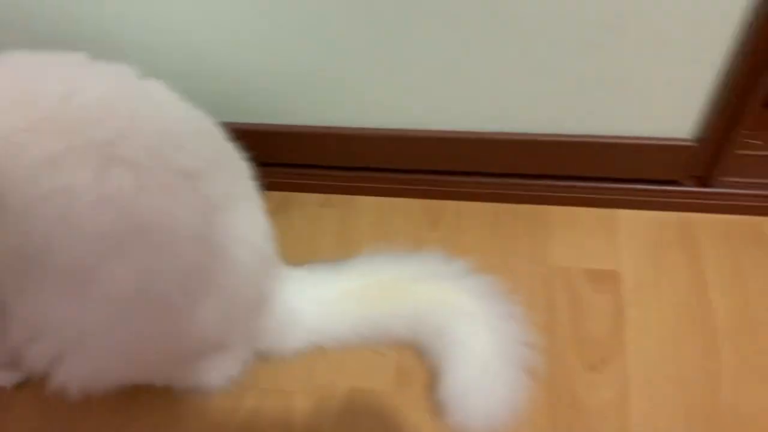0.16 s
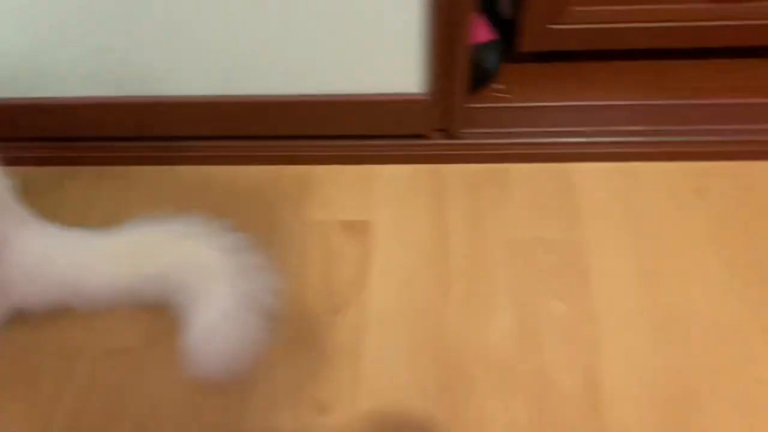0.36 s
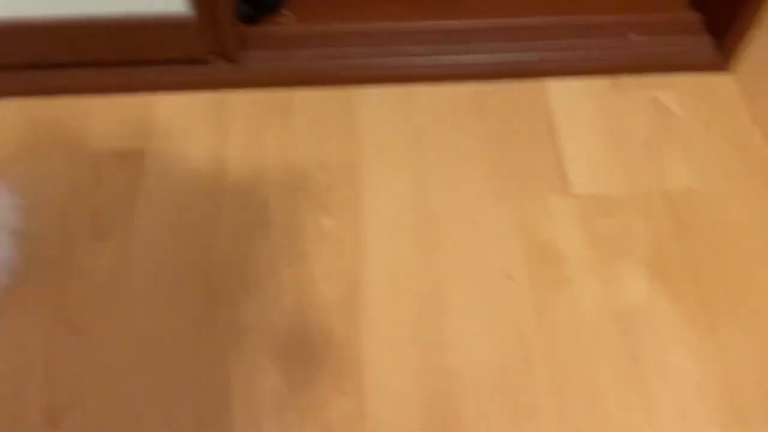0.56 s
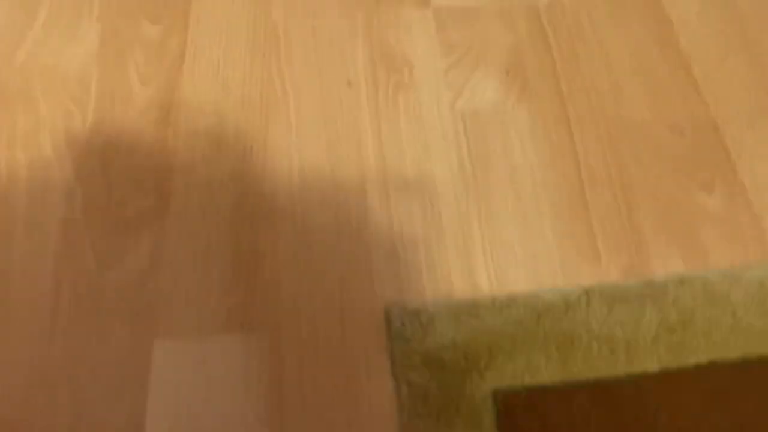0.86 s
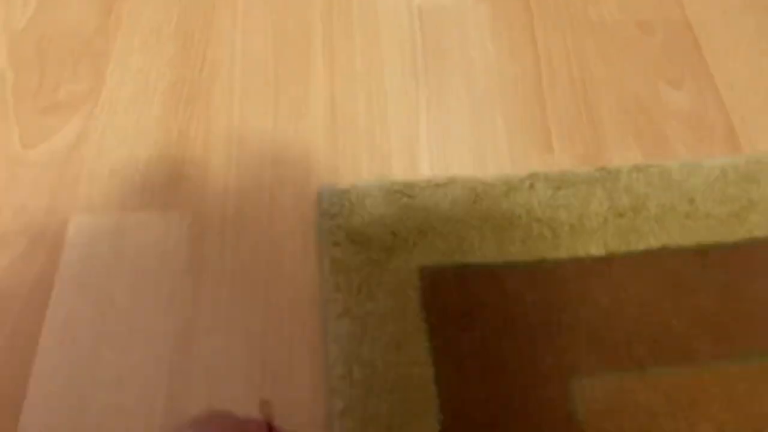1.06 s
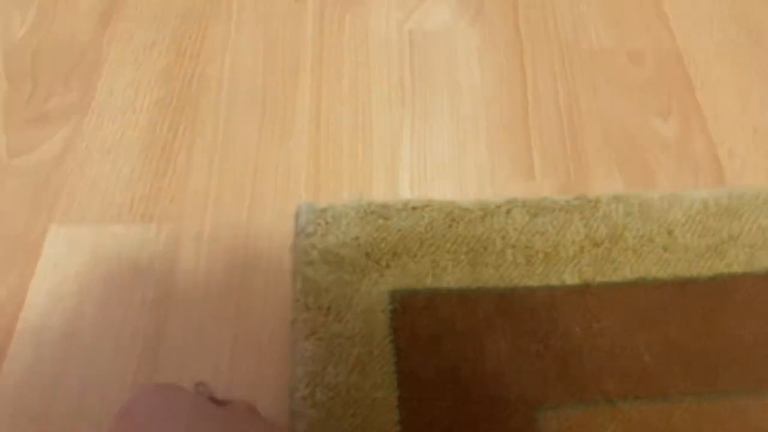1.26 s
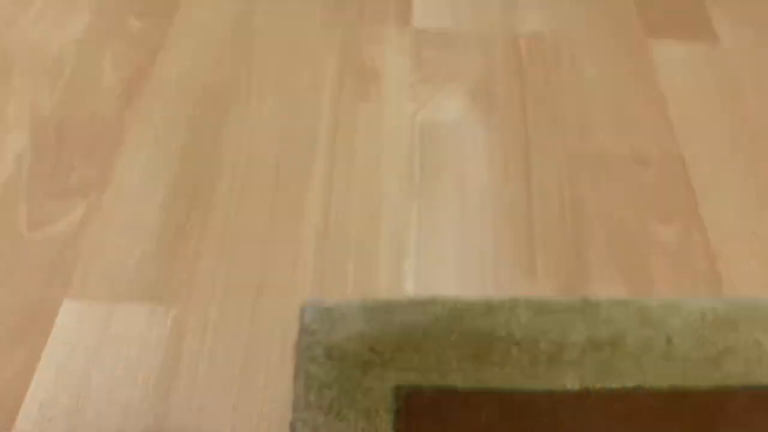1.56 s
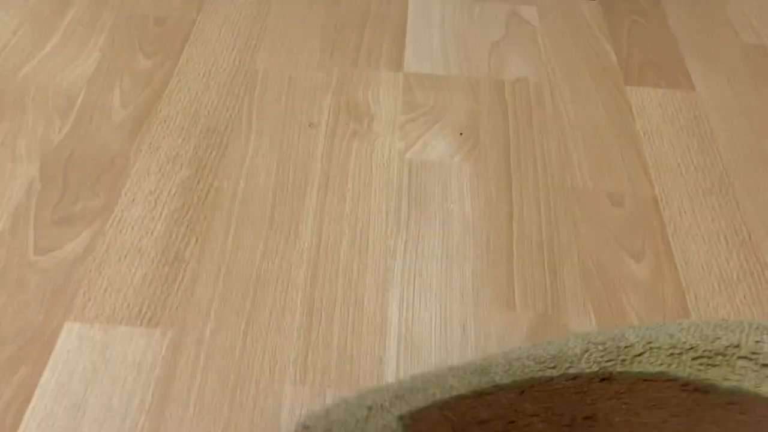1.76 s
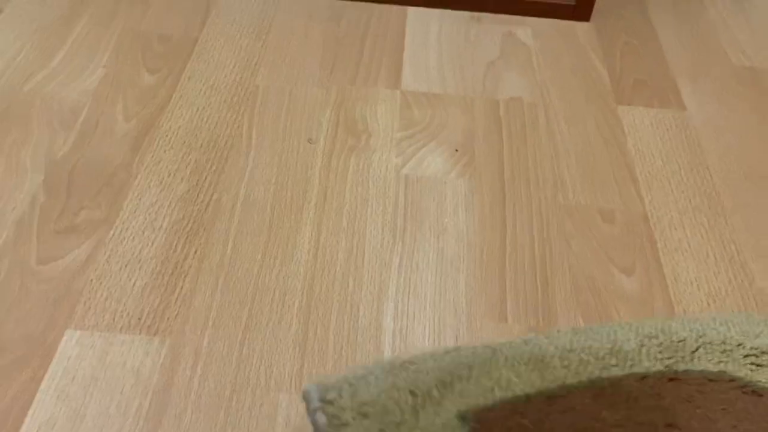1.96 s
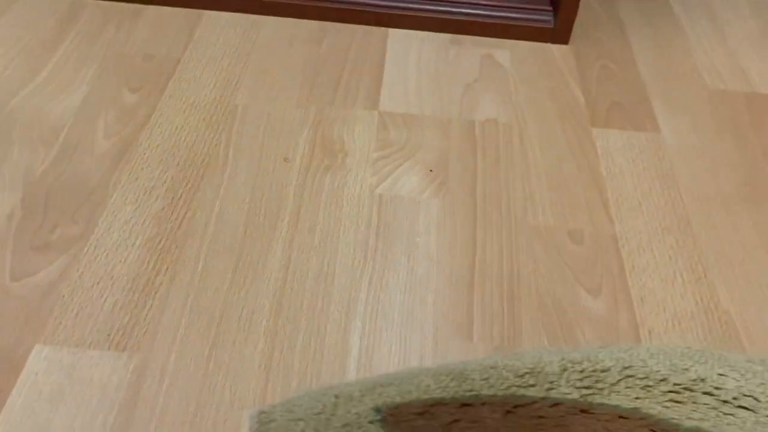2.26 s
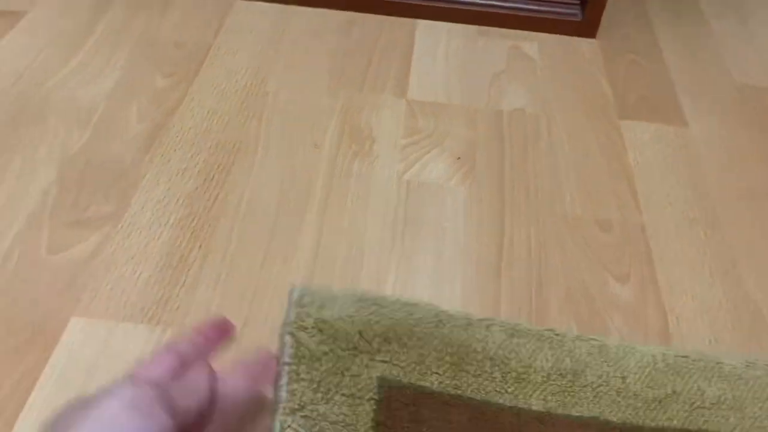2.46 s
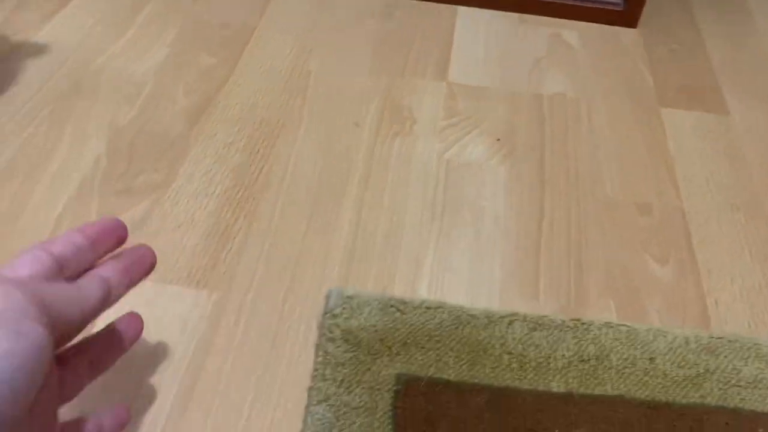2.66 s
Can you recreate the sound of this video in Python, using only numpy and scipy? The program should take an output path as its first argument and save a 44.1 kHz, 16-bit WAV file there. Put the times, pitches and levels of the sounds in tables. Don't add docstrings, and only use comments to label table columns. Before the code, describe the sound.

A small metal pin clicks on a laminate floor in a quiet furnished room, close handheld microphone. Low handling bumps and cloth scuffs open; light taps and wooden knocks come at 0.9-1.0 s, board creaks at 1.1-1.4, a small click at 1.9. The loudest sharp bounce hits at 2.08, weaker ones at 2.2-2.3, then a brief skid and dull paw thump at 2.5, fading to quiet.

```python
import sys
import numpy as np
from scipy import signal
from scipy.fft import rfft, irfft, next_fast_len
from scipy.io import wavfile
from scipy.ndimage import uniform_filter1d

SR = 44100
rng = np.random.default_rng(int(sys.argv[2]) if len(sys.argv) > 2 else 0)


def undo_db(level):
    steps = np.asarray(level, float) / 20
    return 10 ** steps


def wav_out(sig):
    wavfile.write(sys.argv[1], SR, np.round(np.clip(np.atleast_2d(sig).T, -1, 1) * 32767).astype(np.int16))


N = 123479

# time in seconds, level in dB.
GRIP_LEVEL = [(0, -62), (.7, -60), (1.1, -62.5), (1.3, -65), (1.45, -70), (1.55, -78.5), (1.8, -75.5),
              (1.95, -72.5), (2.3, -80.5), (2.42, -63.5), (2.47, -72), (2.55, -58), (2.8, -68)]
# frequency in Hz, density in dB per Hz.
GRIP_SPECTRUM = [(25, -21.5), (60, -4), (130, -5), (250, -21.5), (600, -29), (1200, -67)]
# peak time in seconds, peak in dB, pitch in Hz, width in seconds.
BUMPS = [(0.208, -33.5, 61.8, 0.016), (0.349, -32.5, 65, 0.011), (0.202, -45.5, 128, 0.0047),
         (0.331, -42, 133, 0.0035), (0.3288, -51, 219, 0.0049), (0.371, -39, 74, 0.009),
         (0.395, -39, 59, 0.008), (0.416, -40.5, 60, 0.0035), (0.449, -39.5, 61, 0.012),
         (0.513, -43, 49.5, 0.031), (0.646, -41, 60.6, 0.0096), (0.719, -47, 58.6, 0.015),
         (0.835, -39, 57.7, 0.0084), (0.922, -43, 62, 0.012), (1.462, -57, 77, 0.0052),
         (2.386, -40.5, 80, 0.0043), (2.402, -48, 60, 0.0057), (2.509, -30, 124.3, 0.0034),
         (2.593, -59.5, 80.1, 0.077)]
# time in seconds, level in dB.
AIR_LEVEL = [(0, -67), (.15, -77), (.36, -82), (0.501, -69), (.62, -75), (0.721, -92), (.8, -72),
             (.9, -65.5), (1.049, -63.5), (1.248, -78), (1.5, -67), (1.84, -82.5), (2.05, -65),
             (2.298, -62), (2.42, -69.5), (2.52, -82.5), (2.659, -82.5), (2.8, -74.5)]
# frequency in Hz, density in dB per Hz.
AIR_SPECTRUM = [(88, -40), (150, -10), (282, -7.5), (481, -3), (1180, -17.5), (3100, -19.5), (8000, -24),
                (9000, -32.5), (16500, -28)]
# peak time in seconds, rms in dB, rise in seconds, fall t60 in seconds, centre in Hz.
SCUFFS = [(0.036, -72.5, 0.013, 0.061, 595), (0.089, -70, 0.009, 0.47, 2840),
          (2.054, -58, 0.023, 0.23, 2150), (0.227, -45, 0.053, 0.19, 3430),
          (0.429, -63.5, 0.0035, 0.97, 2850), (0.541, -65, 0.037, 0.35, 5000),
          (0.986, -53.5, 0.013, 0.12, 10500), (2.39, -61.5, .06, 0.25, 11030),
          (0.612, -54.5, 0.055, .15, 2340), (.776, -67, 0.0032, 1, 880), (1.048, -62, 0.049, 0.11, 2350),
          (1.30, -69, 0.019, 0.11, 570), (1.438, -54, 0.072, 0.22, 1500), (1.60, -58.5, 0.14, 0.52, 2670),
          (1.767, -66.5, 0.02, 0.11, 1500), (1.927, -64.5, 0.032, 1, 3370),
          (2.10, -39.5, 0.019, 0.23, 4610), (2.30, -55, 0.057, 0.22, 3750), (2.375, -59.5, .01, 0.15, 1078),
          (2.778, -68.5, 0.14, 0.56, 3660), (0.437, -60.5, 0.0075, 0.56, 670),
          (0.599, -54, 0.057, 0.27, 576), (1.166, -82, 0.11, 0.1, 440), (1.978, -64.5, 0.074, .3, 700),
          (2.509, -60.5, 0.0071, 0.26, 1500)]
# start in seconds, peak in dB, pitch in Hz.
KNOCKS = [(0.701, -56.5, 330), (.7025, -59.5, 624), (0.771, -58.5, 497), (.958, -50.5, 350),
          (1.118, -46, 530), (1.15, -44, 460), (1.1935, -42, 510), (1.295, -56, 645), (1.301, -58, 234),
          (1.389, -53.5, 800), (1.3915, -51, 450), (1.402, -53, 620), (1.409, -49.5, 1030),
          (1.412, -53.5, 398), (1.437, -40.5, 814), (2.097, -41, 530), (2.135, -50, 533), (2.144, -46, 520),
          (0.8865, -35.5, 520), (0.9072, -33.5, 520), (.914, -45, 607), (0.9195, -42.5, 527),
          (0.969, -35, 610), (2.2065, -41.5, 616), (2.217, -47, 487), (2.227, -44.5, 510),
          (2.232, -52, 504), (2.239, -57, 560), (2.2705, -42, 574), (2.284, -53, 414), (2.291, -57.5, 407),
          (2.299, -52, 550), (2.315, -51.5, 524), (2.324, -50.5, 570), (2.3645, -45.5, 595),
          (2.698, -58.5, 436),
          (2.0750, -24, 546),
    (2.1111, -28.5, 519),
    (2.2125, -33, 587),
    (2.277, -43.5, 500),
    (2.371, -48, 620),
    (2.481, -47, 570),
    (2.489, -44, 561),
    (2.507, -46, 328),
    (2.515, -38, 500),
    (2.536, -40.5, 617),
]
# start in seconds, peak in dB, pitch in Hz.
SLIPS = [(1.093, -44.5, 490), (1.099, -48, 420), (1.107, -51, 506), (1.115, -47, 630), (1.126, -48, 542),
         (1.130, -41, 471), (1.137, -56, 405), (1.158, -44.5, 575), (1.172, -45.5, 537), (1.183, -48, 389),
         (1.419, -43.5, 596), (1.423, -45, 627), (1.429, -49, 694), (1.434, -48, 638), (1.877, -48.5, 329),
         (1.884, -43, 342), (1.088, -54, 281), (1.125, -53, 283), (1.155, -55, 257), (2.088, -36, 520),
         (2.124, -39, 517)]
# start in seconds, peak in dB, contact length in seconds, tilt in dB per octave.
STRIKES = [(0.884, -46, 0.0095, -5.5), (.907, -46.5, 0.0033, -2.5), (0.9687, -26, 0.0034, 1),
           (0.9721, -27.5, 0.0027, -3.5), (1.436, -41, 0.011, -2.5), (1.88, -37, 0.0065, -11),
           (1.8848, -32, 0.0008, 4), (2.0746, -16, 0.0017, 3), (2.0769, -12.5, 0.0019, 2),
           (2.0795, -22, 0.0027, 0.5), (2.111, -49.5, 0.0059, -1.5), (2.207, -26, 0.0022, 2.5),
           (2.212, -25.5, 0.0075, 5.5), (2.27, -36.5, 0.0026, 0), (2.276, -36.5, 0.0071, 9),
           (2.469, -48.5, 0.012, 3), (2.48, -43.5, 0.011, -4), (2.496, -28, 0.0069, -11.5)]
# frequency in Hz, level in dB, t60 in seconds.
PIN_MODES = [(1500, -10, 0.0059), (2280, 1, 0.0039), (3004, 10.5, 0.003), (3550, 11.5, 0.0026),
             (4360, 3.5, 0.0038), (5470, 0.5, 0.0032), (6736, -3.5, 0.0048), (7280, -23, 0.011),
             (11340, -33.5, 0.00063), (14100, -18, 0.0082)]
# frequency in Hz, t60 in seconds.
ROOM_T60 = [(150, 0.2), (500, 0.19), (2000, 0.19), (5000, 0.18), (12000, 0.16)]
# frequency in Hz, side minus mid in dB.
WIDTH = [(100, -10.5), (500, -5), (1500, -1.5), (5000, -4), (9000, 0), (14000, 3)]
# lower edge in Hz, upper edge in Hz.
LOST_BANDS = [(8450, 9550), (12500, 13650), (15900, 23000)]
ATTACKS = [
    .886,
    .907,
    .969,
    1.883,
    2.074,
    2.078,
    2.207,
    2.213,
    2.471,
    2.497,
]

SCUFF_OCTAVES, NARROWING = 1.276, 0.27
SKIRT_DB, SKIRT_TILT_DB, DULLING_DB, FOCUS = -8, -2, 6, 0.61
GRAIN_DB = 1
KNOCK_CYCLES, KNOCK_SAG = 3.22, 0.7
SLIP_CYCLES, SLIP_SAG = 5.6, 0.15
SWELL_SKEW, SWELL_EDGE = 0.87, 1.51
BOARD_DB, BOARD_CUT = 2, 0.5
TICK_DB, TICK_HZ, TICK_S = -15.5, 880, 0.0053
CHATTER_PER_S, CRACK_DB = 5100, -8.5
EARLY_UNTIL_S, EARLY_SHIFT, EARLY_CRACK_DB = 1.0, 0.91, 7
PIN_BAND_HZ = [740, 11400]
THUMP_S, THUMP_DB, THUMP_T60_S = 2.4962, -18, 0.032
SWEEP_FROM_HZ, SWEEP_TO_HZ, SWEEP_S = 1067, 221, 0.00372
ROOM_DB, ROOM_GAP_S = 2.5, 0.0011
BOARD_WET_DB, THUMP_WET_DB = -6, -6.5
PIN_PAN_DB, PIN_LEAD_SAMPLES, FLOOR_PAN_DB = 2.5, 1.6, 2.5
KEPT_S = 0.006
LEFT_RIGHT = np.array([[1], [-1]])


def rms_one(x):
    return x / np.sqrt(np.mean(x ** 2) + 1e-20)


def at_hz(points, hz):
    p = np.array(points, float)
    return np.interp(np.log(np.maximum(hz, 1)), np.log(p[:, 0]), p[:, 1])


def coloured(x, points):
    n = x.shape[-1]
    hz = np.arange(n // 2 + 1) * SR / n
    return irfft(rfft(x) * undo_db(at_hz(points, hz)), n)


def stereo(points, n):
    mid, side = coloured(rng.standard_normal((2, n)), points)
    scale = np.sqrt(np.mean(mid ** 2))
    return (mid + coloured(side, WIDTH) * LEFT_RIGHT) / scale


def ring(clicks, hz, t60):
    radius = undo_db(-60 / (t60 * SR))
    w = 2 * np.pi * hz / SR
    return signal.lfilter([0, np.sin(w)], [1, -2 * radius * np.cos(w), radius * radius], clicks + 1e-18)


def add(out, s, x):
    i = max(int(s * SR), 0)
    out[..., i:i + x.shape[-1]] += x[..., :out.shape[-1] - i]


def handling():
    t = np.arange(N) / SR
    bumps = np.zeros(N)
    for s, db, hz, width in BUMPS:
        envelope = np.exp(-0.5 * ((t - s) / width) ** 2)
        bumps += undo_db(db) * envelope * np.cos(2 * np.pi * hz * (t - s))
    delayed_side = undo_db(-15.0) * np.roll(bumps, shift=180) * LEFT_RIGHT
    grip = undo_db(np.interp(t, *np.transpose(GRIP_LEVEL))) * stereo(GRIP_SPECTRUM, N)
    return bumps + delayed_side + grip


def room_air():
    level = np.interp(np.arange(N) / SR, *np.transpose(AIR_LEVEL))
    return undo_db(level) * stereo(AIR_SPECTRUM, N)


def scuffs():
    out, t = np.zeros((2, N)), np.arange(SR) / SR
    hz = np.geomspace(150, 17000, num=24)
    for s, db, rise, t60, centre_hz in SCUFFS:
        rise = np.clip(rise, 0.003, s)
        octaves = SCUFF_OCTAVES * undo_db(-NARROWING * (db + 66.5))
        hump = np.exp(-(np.log2(hz / centre_hz) / octaves) ** 2)
        skirt_db = SKIRT_DB + DULLING_DB * np.log2(centre_hz / 2000) - FOCUS * (db + 65.5)
        skirt = undo_db(2 * (skirt_db + SKIRT_TILT_DB * np.log2(hz / 2000)))
        spectrum = np.c_[hz, 10 * np.log10(hump + skirt)]
        envelope = np.where(t < rise, (t / rise) ** 2, undo_db(-60 * (t - rise) / t60))
        grain = undo_db(GRAIN_DB * rms_one(uniform_filter1d(rng.standard_normal(SR), size=150)))
        add(out, s - rise, undo_db(db) * envelope * grain * stereo(spectrum, SR))
    return out


def board_burst(hz, cycles, sag):
    t = np.arange(SR // 20) / SR
    progress = np.clip(t * hz / cycles, 0, 1)
    phase = 2 * np.pi * np.cumsum(hz * (1 + sag * (0.5 - progress))) / SR
    swell = np.abs(np.sin(np.pi * progress ** SWELL_SKEW)) ** SWELL_EDGE
    tick = ring(rng.standard_normal(len(t)), TICK_HZ, 0.003)
    tick = rms_one(ring(tick, TICK_HZ, 0.003))
    tick = undo_db(TICK_DB) * tick * np.exp(-t / TICK_S) * np.clip(t * 2000, 0, 1)
    low_cut = signal.butter(3, BOARD_CUT * hz, "high", fs=SR, output="sos")
    return signal.sosfilt(low_cut, tick - swell * np.sin(phase))


def boards():
    out = np.zeros(N)
    for s, db, hz in KNOCKS:
        add(out, s, undo_db(db + BOARD_DB) * board_burst(hz, KNOCK_CYCLES, KNOCK_SAG))
    for s, db, hz in SLIPS:
        add(out, s, undo_db(db + BOARD_DB) * board_burst(hz, SLIP_CYCLES, SLIP_SAG))
    return out


def pin():
    near, far, t = np.zeros(N), np.zeros(N), np.arange(SR // 20) / SR
    band = signal.butter(2, PIN_BAND_HZ, "band", fs=SR, output="sos")
    tap = 1.0 * (t == 0)
    for s, db, length, tilt_db in STRIKES:
        chance, size = rng.random(len(t)), rng.standard_normal(len(t))
        contact = np.sin(np.pi * np.clip(t / length, 0, 1)) ** 0.5
        touches = size * (chance < CHATTER_PER_S / SR) * contact
        early = s < EARLY_UNTIL_S
        crack = undo_db(CRACK_DB + EARLY_CRACK_DB * early + 2 * tilt_db) * 10 * np.diff(tap, prepend=0)
        body, blur = crack.copy(), crack.copy()
        for k, (hz, mode_db, t60) in enumerate(PIN_MODES):
            hz = hz * (EARLY_SHIFT if early else 1)
            gain = undo_db(mode_db + tilt_db * np.log2(hz / 4000)) * (-1) ** k
            body += gain * ring(tap, hz, t60)
            blur += undo_db(15.5) * gain * ring(tap, hz, t60 / 2)
        x = signal.sosfilt(band, signal.fftconvolve(touches, body)[:len(t)])
        x = undo_db(db) * x / np.abs(x).max()
        add(near, s, x)
        add(far, s, rms_one(signal.sosfilt(band, blur)) * np.std(x))
    return near, far


def thump():
    out, t = np.zeros(N), np.arange(SR // 5) / SR
    hz = SWEEP_TO_HZ + (SWEEP_FROM_HZ - SWEEP_TO_HZ) * np.exp(-t / SWEEP_S)
    onset = 1 - np.exp(-(t / 0.0013) ** 2)
    decay = undo_db(-60 * np.maximum(t - 0.006, 0) / THUMP_T60_S)
    add(out, THUMP_S, undo_db(THUMP_DB) * onset * decay * np.sin(2 * np.pi * np.cumsum(hz) / SR))
    return out


def room(x):
    t, n = np.arange(SR // 2) / SR, next_fast_len(N + SR)
    white = stereo([(100, 0.046), (16000, 0.045)], len(t))
    tail = np.zeros((2, len(t)))
    for low in 90 * 2.0 ** np.arange(8):
        octave = signal.butter(2, [low, min(2 * low, 19000)], "band", fs=SR, output="sos")
        tail += signal.sosfilt(octave, white) * undo_db(-60 * t / at_hz(ROOM_T60, 1.4 * low))
    tail = tail * np.clip(t / ROOM_GAP_S, 0, 1)
    tail = tail / np.sqrt(np.sum(tail ** 2) / 2)
    return undo_db(ROOM_DB) * irfft(rfft(x, n) * rfft(tail, n), n)[:, :N]


def scene():
    background = handling() + room_air() + scuffs()
    knocks, (near, far), blow = boards(), pin(), thump()
    samples = np.arange(N)
    leading = np.interp(samples + PIN_LEAD_SAMPLES, samples, near)
    direct = np.array([leading, near]) * undo_db(PIN_PAN_DB * LEFT_RIGHT)
    direct = direct + (knocks + blow) * undo_db(FLOOR_PAN_DB * LEFT_RIGHT)
    reply = room(far + undo_db(BOARD_WET_DB) * knocks + undo_db(THUMP_WET_DB) * blow)
    return direct + reply + background


def top_cut(x):
    return signal.sosfilt(signal.butter(12, 16700, fs=SR, output="sos"), x)


def record(dry):
    hz, t = np.arange(N // 2 + 1) * SR / N, np.arange(N) / SR
    in_lost_band = sum((hz > low) & (hz < high) for low, high in LOST_BANDS)
    lost = irfft(rfft(dry) * in_lost_band, N)
    at_attack = sum((t > s) & (t < s + KEPT_S) for s in ATTACKS) > 0
    kept = uniform_filter1d(at_attack * 1.0, size=90)
    return top_cut(dry - lost * (1 - kept))


dry = scene()
out = record(dry)
wav_out(out)
```